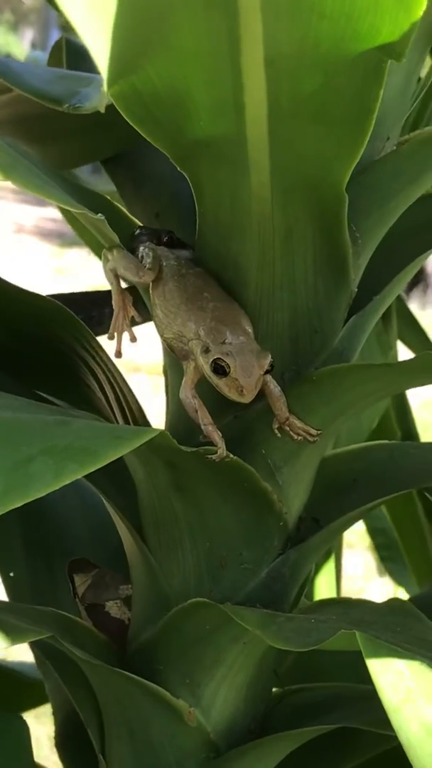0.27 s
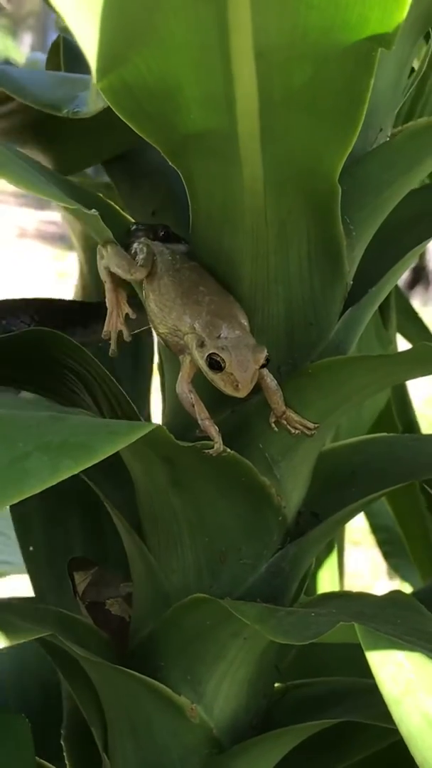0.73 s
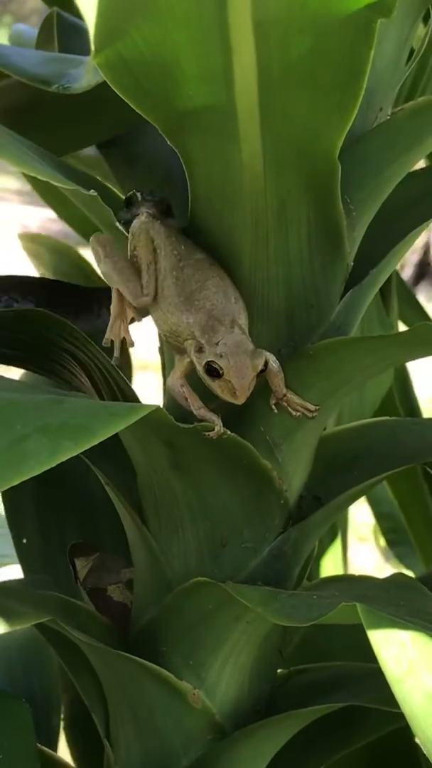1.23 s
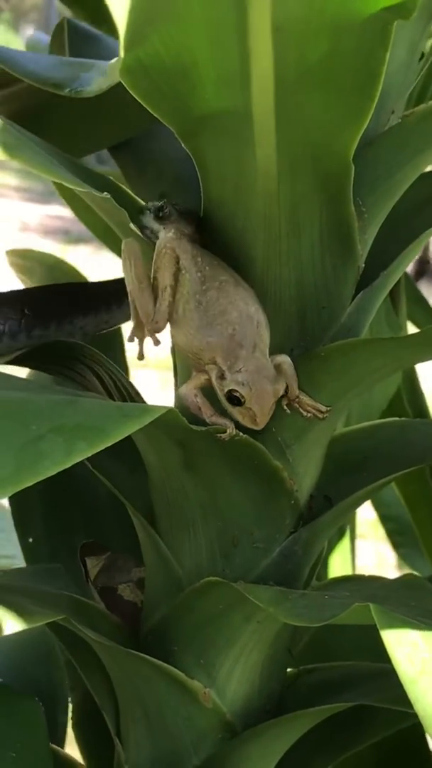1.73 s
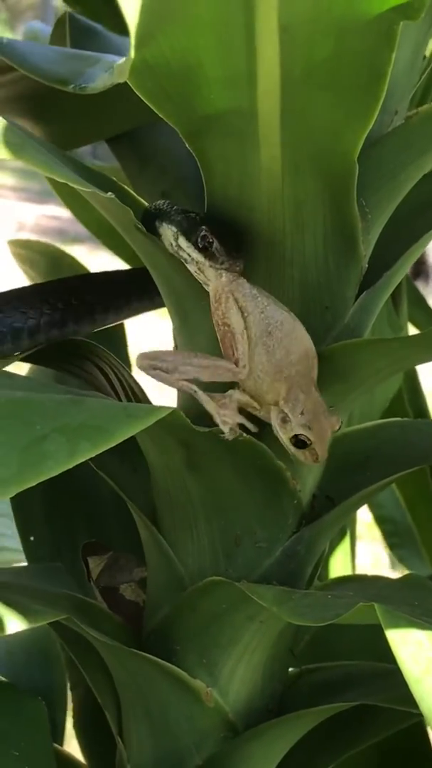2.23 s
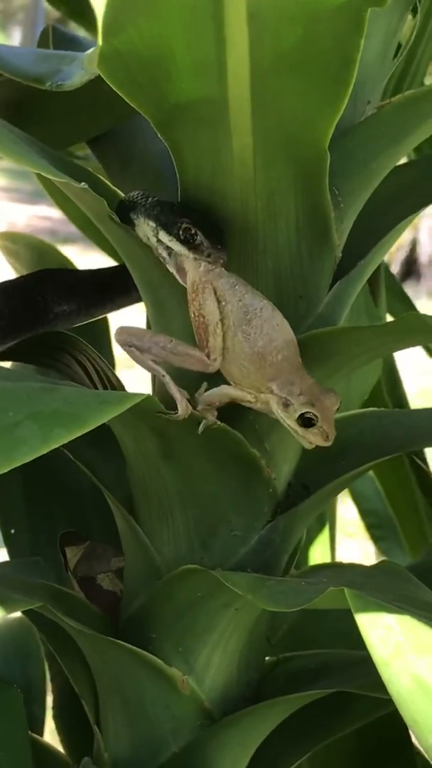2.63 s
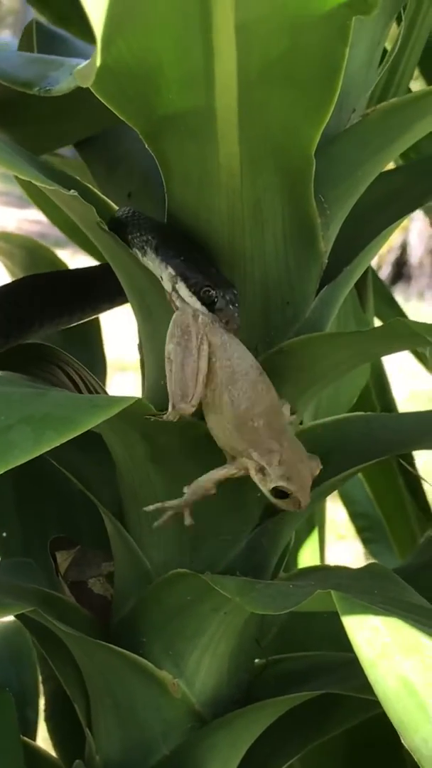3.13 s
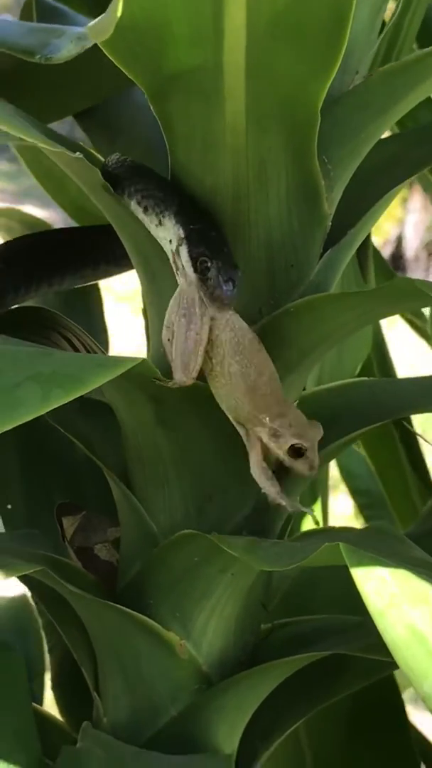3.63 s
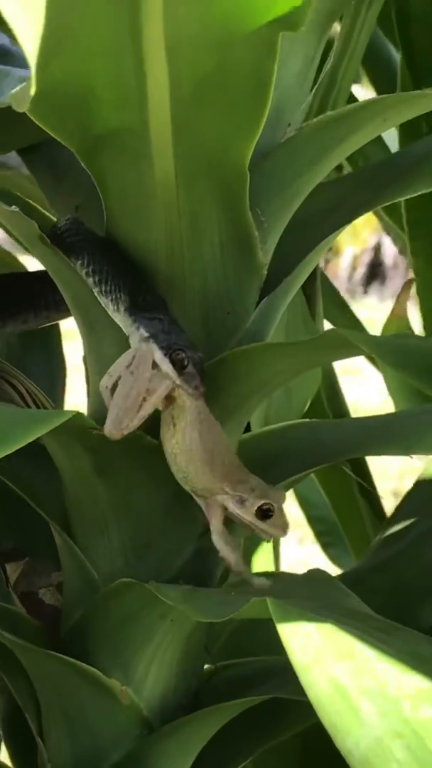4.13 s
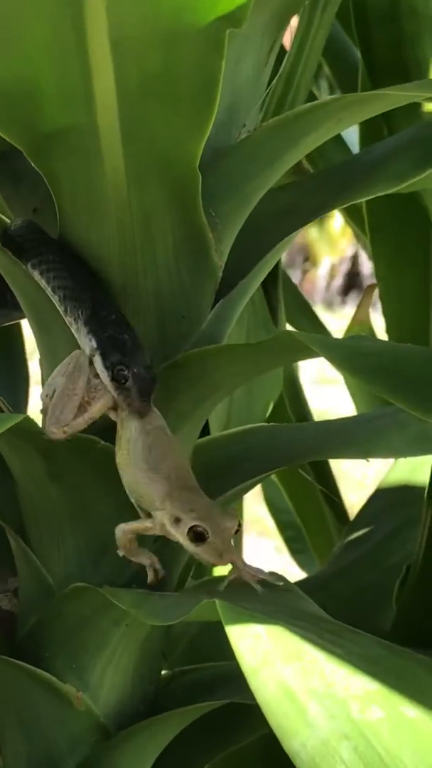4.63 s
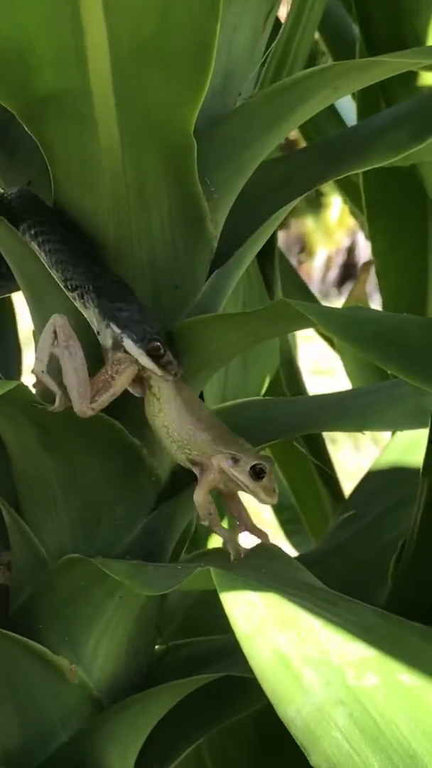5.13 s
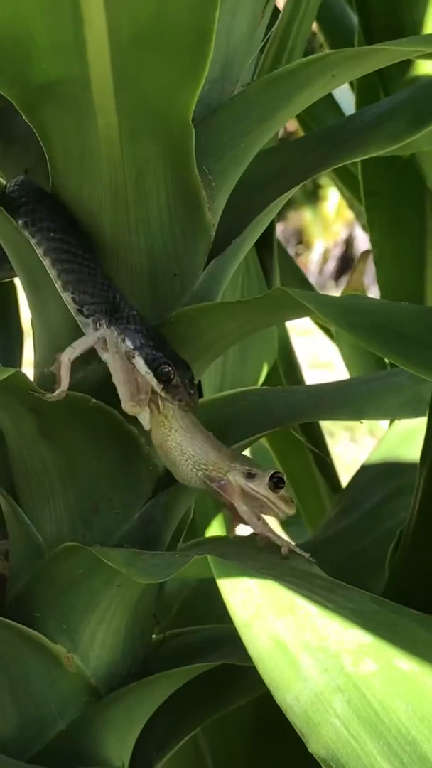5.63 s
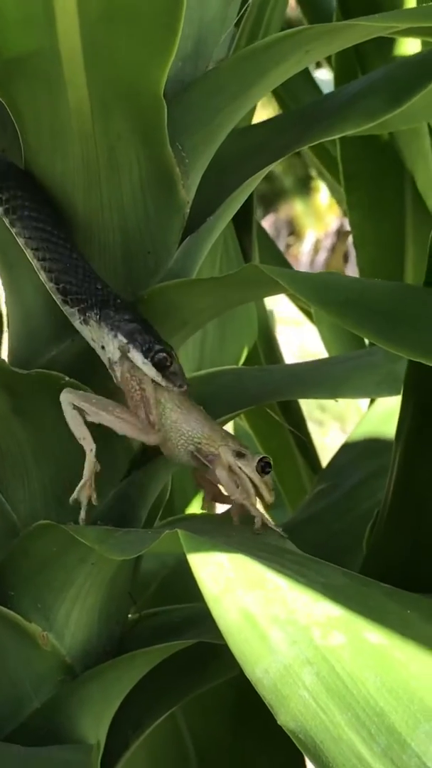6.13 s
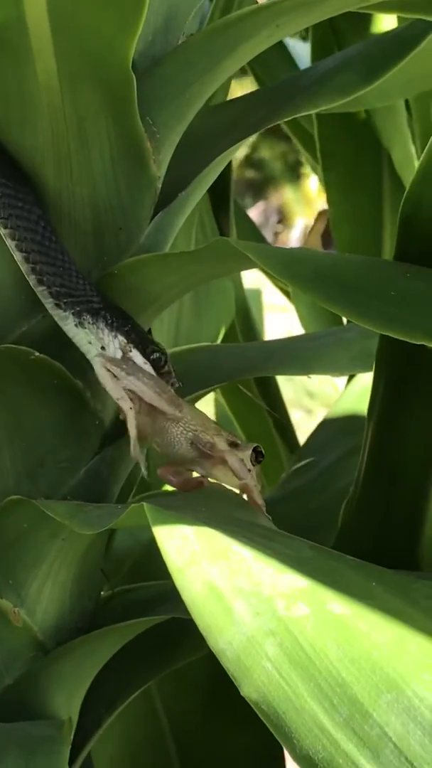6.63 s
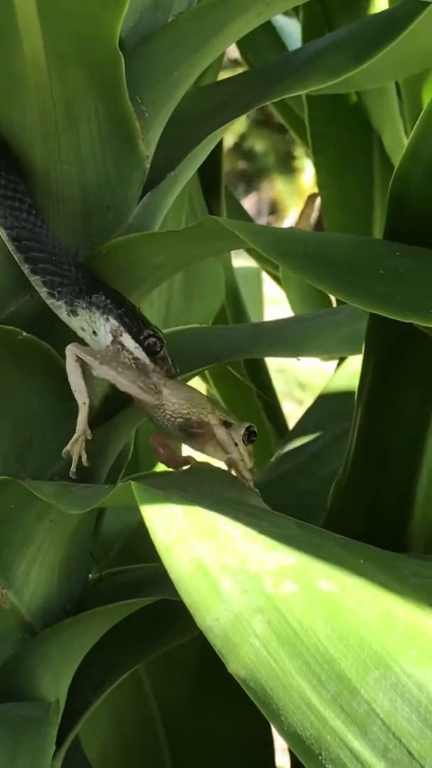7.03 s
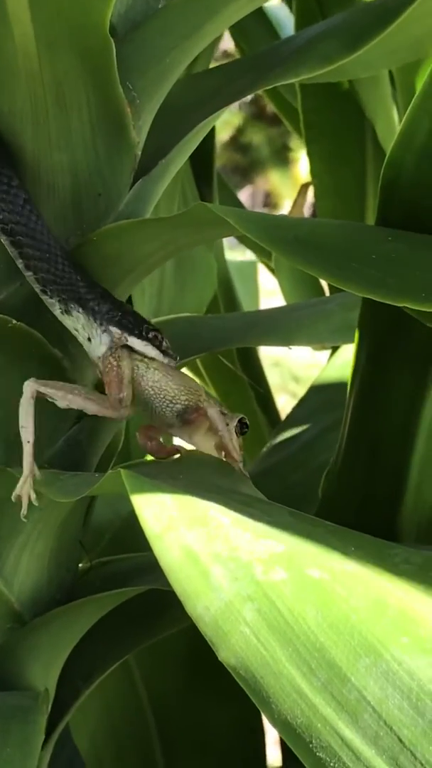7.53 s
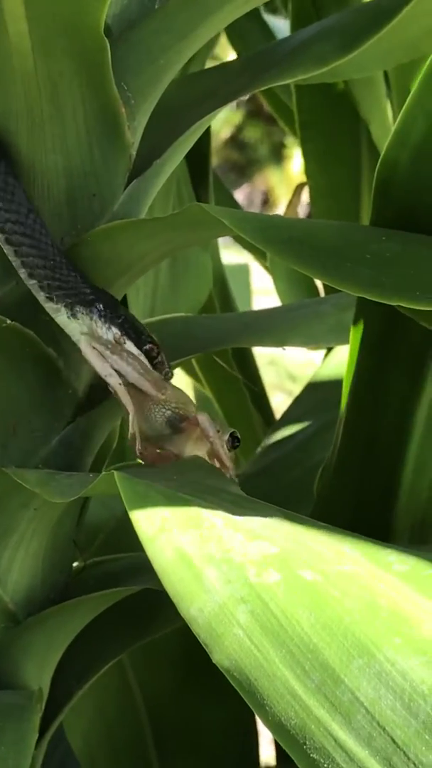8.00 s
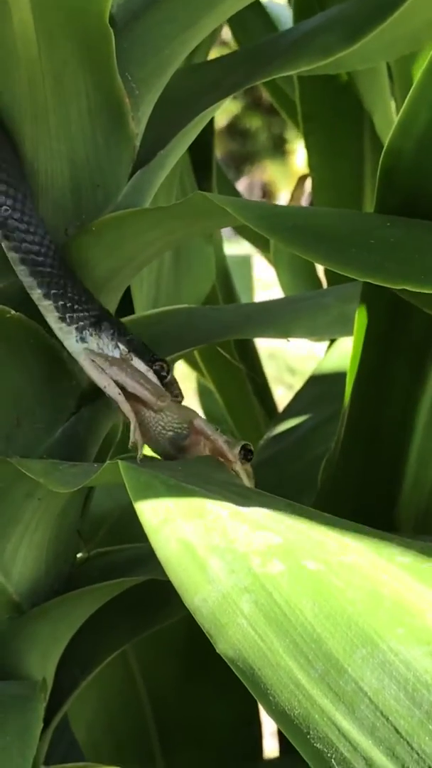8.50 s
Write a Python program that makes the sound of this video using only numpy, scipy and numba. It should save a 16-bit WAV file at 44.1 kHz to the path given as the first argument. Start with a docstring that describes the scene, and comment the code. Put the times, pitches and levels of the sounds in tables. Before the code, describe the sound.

In a quiet garden, a small bird chirps faintly far off and a leaf ticks. Then a frog held by a snake screams seven times close to the microphone, each cry short, shrill and wavering, dropping to a dull, creaking groan. Faint gasps fall between some cries. Soft gusts rumble on the microphone through the later screams, and a distant dove coos faintly twice.

```python
"""A small bird chirps far off and leaves tick in a breezy garden. From 2.4 s a tree frog, gripped by a
snake among broad leaves, screams seven times close by. Each cry follows the source-filter principle:
vocal-fold pulses ring in the open mouth, then sink to a dull, creaking groan as it shuts. Faint gasps
follow four of the cries. A distant dove coos after the second, gusts nudge the microphone from the
end of the third, and the dove coos again as the last one dies."""
import sys
import numpy as np
from scipy import signal
from scipy.fft import rfft, irfft
from scipy.io import wavfile
from scipy.ndimage import uniform_filter1d
from numba import njit

SR = 44100
rng = np.random.default_rng(int(sys.argv[2]) if len(sys.argv) > 2 else 0)


def wav_out(sig):
    """Save sig, one row per channel (or a flat mono array), as 16-bit PCM at SR to the path in sys.argv[1]."""
    wavfile.write(sys.argv[1], SR, np.round(np.clip(np.atleast_2d(sig).T, -1, 1) * 32767).astype(np.int16))


N = 386316

# Timing of each scream: start_s, jaws_open_s, voice_clears_s, jaws_shut_s, end_s
SCREAM_TIMES = [(2.405, 2.431, 2.445, 2.9, 3.0), (3.0, 3.038, 3.082, 3.34, 3.445),
                (3.74, 3.748, 3.778, 4.31, 4.382), (4.63, 4.634, 4.69, 4.955, 5.02),
                (5.342, 5.348, 5.4, 5.644, 5.732), (5.93, 5.93, 5.995, 6.243, 6.312),
                (7.508, 7.511, 7.546, 7.922, 8.008)]
# Voice of each scream: first_pitch_hz, last_pitch_hz, first_mouth_hz, mouth_width_hz, roughness,
# edge_db, top_hz, top_db, top_swell_db, throat_db, groan_db, lip_seal_db_per_s
SCREAM_VOICES = [(476, 420, 2000, 360, 0.09, -39.5, 15600, -37, 6, -42, -4.5, 49),
                 (464, 197, 2000, 530, 0.18, -32.5, 14650, -34, 1, -41.5, -2, 130),
                 (472.6, 148, 3550, 960, 0.07, -38.5, 14150, -35.5, 0, -41, 0.5, 241),
                 (524, 150, 3500, 580, 0.13, -38.5, 15400, -42, -3, -42, 0.5, 242.5),
                 (230.7, 162, 5100, 390, .08, -39, 12870, -44.5, -1, -41.5, 0, 264),
                 (355.5, 176, 5000, 620, 0.22, -39, 13320, -43.5, -6.5, -44, 4, 263),
                 (420, 210, 4200, 750, 0.05, -38, 13400, -45.5, 2, -42, 3, 283)]
# Pulse rate while the cry is held, one curve a scream: time_s, pitch_hz
HELD_PITCH = [
    [(2.435, 642), (2.477, 680), (2.587, 616), (2.619, 626), (2.647, 661), (2.753, 688), (2.835, 617.4),
     (2.877, 607), (2.89, 591)],
    [(3.045, 586), (3.055, 613), (3.089, 756), (3.123, 780), (3.163, 768), (3.203, 707.5), (3.295, 667.8),
     (3.325, 620)],
    [(3.76, 612), (3.786, 742), (3.808, 764), (3.85, 769), (3.972, 703), (4.004, 674.5), (4.164, 616.5),
     (4.268, 616.6), (4.295, 598)],
    [(4.645, 589), (4.661, 600), (4.685, 715), (4.723, 737), (4.749, 704), (4.791, 646), (4.807, 626),
     (4.847, 616.7), (4.93, 541)],
    [(5.39, 420.5), (5.402, 482), (5.418, 509), (5.434, 514), (5.478, 472.5), (5.522, 479.5),
     (5.542, 467.3), (5.62, 471)],
    [(5.96, 477), (5.996, 637), (6.01, 683), (6.026, 683), (6.058, 586), (6.11, 518), (6.2, 471.6),
     (6.22, 469)],
    [(7.525, 533), (7.543, 710), (7.569, 772), (7.603, 784), (7.651, 716), (7.675, 715.3), (7.793, 620),
     (7.869, 588.6), (7.895, 567)],
]
# Resonance of the open mouth, one curve a scream: time_s, resonance_hz, level_db
OPEN_MOUTH = [
    [(2.445, 4650, -23.5), (2.469, 6160, -29.5), (2.491, 6340, -22.5), (2.603, 5740, -21.5),
     (2.657, 4950, -26), (2.733, 5220, -20.5), (2.803, 5070, -21), (2.861, 4320, -21.5), (2.88, 4220, -26)],
    [(3.055, 4000, -29.5), (3.081, 4320, -20.5), (3.133, 4280, -24), (3.159, 4210, -20.5),
     (3.213, 4150, -21.5), (3.32, 3770, -27.5)],
    [(3.765, 6350, -19), (3.831, 6080, -17.5), (4.045, 5100, -21), (4.115, 4420, -20), (4.285, 4334, -20)],
    [(4.65, 5850, -22.5), (4.692, 6440, -22.5), (4.728, 6430, -16.5), (4.786, 5930, -17.5),
     (4.884, 5490, -24.5), (4.935, 4390, -25)],
    [(5.365, 5950, -27.5), (5.389, 6040, -22), (5.435, 6100, -18.5), (5.531, 5530, -24), (5.593, 5200, -24),
     (5.615, 5120, -25.5)],
    [(5.945, 6510, -22.5), (6.009, 6650, -20.5), (6.153, 6000, -19.5), (6.215, 5480, -27.5)],
    [(7.525, 6920, -22), (7.585, 6990, -15.5), (7.667, 6590, -15), (7.715, 5740, -23), (7.885, 5200, -24),
     (7.895, 5220, -21)],
]
# Stretches where the folds beat unevenly: start_s, end_s, roughness
RASPS = [(2.486, 2.56, .45), (2.791, 2.82, 0), (3.251, 3.31, 0.33), (3.859, 3.901, 0.37),
         (4.72, 4.774, 0.5), (6.09, 6.153, 0.42)]
# Cracks in the voice: centre_s, half_width_s, jump_db
CRACKS = [(2.52, 0.016, -3.5), (3.061, .004, 4), (3.069, 0.0041, -0.5), (3.128, 0.011, -3.5),
          (3.778, 0.00491, -6), (4.011, 0.0067, -5.5), (4.025, 0.01806, -2.5), (4.873, 0.0057, 3),
          (4.892, 0.0091, -2.5), (5.506, 0.0071, -1.5), (5.632, 0.0059, 3), (6.242, 0.005, 3),
          (7.639, 0.0078, -2.5), (7.88, 0.0078, 2), (7.896, 0.0058, -9)]
def frog(mouth_db, top_db, throat_db, flutter_db):
    """Source-filter model: fold pulses excite the mouth, the shrill modes above it and the throat."""
    t = clock()
    screams = [scream(*cry) for cry in zip(SCREAM_TIMES, SCREAM_VOICES, HELD_PITCH, OPEN_MOUTH)]
    pitch, rough, mouth_hz, width_hz, top_hz, loud, edge, top, wall = in_time(np.vstack(screams))
    gape = np.clip((loud + 50) / 26, 0, 1)   # the louder the cry, the wider the jaws
    rasps = sum(amount * ((t > start) & (t < end)) for start, end, amount in RASPS)
    rough = rough + uniform_filter1d(rasps, size=500)
    cracks_db = sum(db * np.exp(-((t - s) / half_width) ** 2) for s, half_width, db in CRACKS)
    pulses, puffs = vocal_folds(pitch * (1 + .0017 * cracks_db), rough)   # cracks also jog the pitch
    source = pulses + (.0015 + .021 * rough) * puffs
    breathy = pulses + (.045 + .19 * rough) * puffs   # turbulence weighs more in the treble
    mouth_gain = from_db(loud + mouth_db + cracks_db + flutter_db * drift(62))
    cry = mouth_gain * mouth(source, mouth_hz, width_hz)
    cry += from_db(edge) * bright_edge(breathy)
    cry += from_db(top + top_db) * top_mode(breathy, top_hz)
    cry += from_db(wall + throat_db) * throat(source, gape)
    return sounding(screams, fade_s=.00622) * cry


def scream(timing, voice, held_pitch, held_mouth):
    """Articulation: in one breath the jaws open, hold and shut, moving the resonances and levels."""
    start, opens, clears, shuts, end = timing
    first_hz, last_hz, first_mouth_hz, width_hz, hoarse = voice[:5]
    edge_db, top_hz, top_db, top_swell_db, throat_db, groan_db, seal_db_per_s = voice[5:]
    t = np.linspace(start, end, 600)
    since, left = np.maximum(t - opens, 0), np.maximum(shuts - t, 0)
    along = since / (since + left) - .5   # -0.5 as the jaws open, +0.5 as they shut
    unopened, closing = np.exp(-since / .006), np.exp(-left / .0076)
    shut = np.maximum(unopened, closing)
    closed_s = np.maximum(np.maximum(opens - t, t - shuts), 0)
    sealed_db = seal_db_per_s * closed_s

    # The pitch scoops up, holds, then sinks to a groan as the air runs out.
    release_s, release_hz = held_pitch[-1]
    spent = np.clip((t - release_s) / (end - release_s), 0, 1)
    droop = spent ** 4
    pitch = np.interp(t, *np.transpose([(start, first_hz), *held_pitch]))
    pitch += (last_hz - pitch) * (.64 * spent + .36 * droop)
    sunk_octaves = np.clip(np.log2(release_hz / pitch), 0, 1) * (t > shuts)
    attack = np.exp(-(since / (clears - opens)) ** 6)
    rough = hoarse + .7 * attack + .25 * sunk_octaves   # hoarse at both ends

    times, resonances, levels = np.transpose(held_mouth)
    mouth_hz, held_db = np.interp(t, times, resonances), np.interp(t, times, levels)
    mouth_hz += (first_mouth_hz - mouth_hz) * np.exp(-since / .0093)   # climbs as the jaws open
    mouth_hz += (3107 - mouth_hz) * np.exp(-left / .017)   # sinks as they shut
    width = width_hz * 2 ** (.4 * (levels.mean() - held_db))   # louder is narrower
    width += (1100 - width) * shut
    leak = 1 - np.exp(-closed_s / .008)   # shut lips leave only a broad, thin leak
    mouth_hz += (5500 - mouth_hz) * leak
    width += (2200 - width) * leak
    sagging_top_hz = top_hz - 1500 * along

    # Levels in dB: shut jaws muffle the mouth, the edge and the top.
    effort = np.log2(pitch / 620)   # a higher scream is a brighter one
    edge_hz, edge_width_hz, _ = EDGE_MODES[0]
    nearness = np.log2(2090 / np.maximum(edge_hz - mouth_hz, edge_width_hz))   # close modes reinforce
    loud = held_db - 25.5 * shut - sealed_db - 13 * sunk_octaves
    edge = edge_db + 9 * effort + 10.5 * nearness - 10.5 * shut - sealed_db - 13 * sunk_octaves
    top = top_db + 10.5 * effort + top_swell_db * along - 11.5 * shut - sealed_db

    # The throat wall swells through the scream and carries on as the groan.
    strain = np.maximum(np.log2(pitch / 715), 0)   # the voice thins at its highest
    catch = np.exp(-((t - shuts) / .0089) ** 2)   # and catches as the jaws shut
    wall = throat_db + 4.5 * along - 6.5 * unopened + groan_db * closing
    wall -= 40 * strain + 8 * catch + 7 * droop
    return np.transpose([t, pitch, rough, mouth_hz, width, sagging_top_hz, loud, edge, top, wall])


def vocal_folds(pitch_hz, rough, waver=.0024, shimmer_db=.15):
    """Glottal excitation: a sharp pulse each cycle, with a puff of breath noise centred on it."""
    jitter = .0005 + .009 * rough
    hz = pitch_hz * (1 + waver * drift(61.33) + jitter * drift(440))
    phase = np.cumsum(hz) / SR
    offset = (phase - np.round(phase)) * SR / hz   # samples from the nearest pulse
    pulses = np.sinc(.85 * offset) * np.exp(-(offset / 9) ** 2)
    puffs = rng.standard_normal(N) * np.cos(np.pi * phase) ** 4
    return pulses * from_db(shimmer_db * (1 + 6 * rough) * drift(200)), puffs


# Steady resonances of the head: centre_hz, width_hz, level_db
PALATE_MODES = [(3076, 100, -22.5), (3884, 504, -21.5), (5560, 320, -15), (6960, 110, -33)]
def mouth(source, centre_hz, width_hz, palate_db_per_octave=-15.5):
    """Cavity resonance: a narrow moving peak on a broad one; the palate's modes fade as it climbs."""
    palate = from_db(palate_db_per_octave * np.log2(centre_hz / 5200)) * resonate(source, PALATE_MODES)
    peak = formant(source, centre_hz, width_hz)
    ring = formant(peak, centre_hz, width_hz=2370) + palate
    return even(cut(cut(ring, 1600, "high", order=3), 8310, "low", order=5))


# Shrill resonances above that of the mouth: centre_hz, width_hz, level_db
EDGE_MODES = [(7830, 590, 10), (9630, 990, -1), (11870, 210, 1), (12800, 470, -13), (15370, 550, -5)]
def bright_edge(source):
    """Higher modes: steady treble resonances give the cry its edge."""
    return even(cut(resonate(source, EDGE_MODES), 6980, "high", order=6))


def top_mode(source, centre_hz):
    """Formant glide: one moving resonance colours the highest treble."""
    return even(cut(formant(source, centre_hz, width_hz=750), 11000, "high", order=4))


def throat(source, gape, shut_hz=1572, open_hz=2000, leak_db=-23):
    """Wall resonance: the throat rings low and dull, and lower still once the mouth has shut."""
    ring = formant(source, shut_hz + (open_hz - shut_hz) * gape, width_hz=376)
    dull = cut(cut(ring, 860, "high", order=3), 3800, "low", order=5)
    leak = from_db(leak_db) * gape * cut(source, (2600, 3400), "band")
    return even(dull + leak)


# Breaths drawn between screams: centre_s, length_s, level_db
GASPS = [(3.52, 0.068, -53), (4.5, 0.05, -51), (5.81, 0.075, -49.5), (6.39, 0.08, -51.5)]
def gasps(squeak_hz, width_hz):
    """Noise-driven resonance: air drawn back through the narrow glottis squeaks faintly."""
    squeak = formant(rng.standard_normal(N), squeak_hz * (1 + .07 * drift(20)), width_hz)
    return swells(GASPS) * rms_one(cut(squeak, (1200, 2800), "band"))


# Snaps of a leaf: start_s, relative_level_db
TICKS = [(0.3654, -37), (0.39, -25.5), (0.4044, -38), (5.1721, -46.5)]
# Spectrum of a snap: frequency_hz, level_db
TICK_SPECTRUM = [(1500, -20), (2500, -6), (4000, -13), (7000, -9.5), (14000, 2), (16000, -21)]
def leaf_ticks(t60_s, gain_db):
    """Damped transients: a stiff leaf slips and snaps under the animals."""
    t = clock()
    bursts = sum((t >= s) * from_db(db - 60 * np.clip((t - s) / t60_s, 0, 2)) for s, db in TICKS)
    return from_db(gain_db) * bursts * noise(TICK_SPECTRUM)


# Strength of the breeze: time_s, level_db
BREEZE = [(0, -47), (.5, -45), (.7, -49), (1.9, -50.5), (2.2, -47), (3.4, -52.5), (4.4, -43), (5.1, -45.5),
          (5.7, -39.5), (6.9, -40.5), (7.7, -48.5), (8.76, -49)]
# Gusts on the microphone: centre_s, length_s, level_db
GUSTS = [(4.44, 0.047, -35.5), (5.17, 0.049, -35.5), (5.3, 0.053, -35), (5.61, 0.056, -33),
         (5.73, 0.053, -32.5), (5.86, .06, -32), (5.99, 0.075, -28.5), (6.1, .06, -35.5),
         (6.22, 0.043, -38), (6.44, 0.11, -27), (6.78, 0.08, -34), (7.08, 0.086, -36.5), (7.46, .05, -34)]
# Spectrum of the rumble: frequency_hz, density_db
WIND_SPECTRUM = [(25, -15), (40, 2.5), (62, 6.5), (80, -1), (120, -5), (160, -13), (250, -28.5),
                 (400, -38.5)]
def wind(gain_db, lump_db):
    """Turbulent pressure on the microphone: breeze and gusts add in power."""
    breeze = from_db(in_time(BREEZE)[0] + gain_db + lump_db * drift(7.1))
    return np.hypot(breeze, swells(GUSTS)) * noise(WIND_SPECTRUM)


# The small bird's rising chirps: start_s, length_s, start_pitch_hz, level_db
CHIRPS = [(.35, .13, 2150, -65), (.42, 0.083, 2900, -70), (.845, 0.091, 2080, -63), (.93, .1, 2850, -71),
          (.985, .1, 2220, -66), (1.377, 0.13, 2200, -64), (1.5, .1, 2250, -66)]
# The dove's level coos: start_s, length_s, pitch_hz, level_db
COOS = [(3.431, 0.18, 658, -59), (3.55, .23, 498, -69), (7.95, 0.48, 521.5, -59)]
def bird(calls, rise_hz_per_s):
    """Pure-tone song: each far call is one sinusoid, level or in a linear sweep."""
    out = np.zeros(N)
    for start, length, hz, db in calls:
        age, at = np.arange(int(length * SR)) / SR, int(start * SR)
        envelope = from_db(db) * np.sqrt(2 * np.sin(np.pi * age / length))
        phase = np.cumsum(hz + rise_hz_per_s * age) / SR
        out[at:at + len(age)] += envelope * np.sin(2 * np.pi * phase)
    return out


# Strength of the background hiss: time_s, relative_level_db
HISS_LEVEL = [(0, -60), (.5, -58.5), (.9, -65), (1.3, -62), (2.2, -64.5), (3.6, -66.5), (5.15, -70),
              (6.6, -69), (7.4, -70), (8.1, -61.5), (8.76, -61)]
# Spectrum of the hiss: frequency_hz, density_db
HISS_SPECTRUM = [(2200, -5), (3300, 1.5), (4900, -6.5), (6000, -5), (9700, -8), (10500, -9), (12500, -8.5),
                 (15000, -9), (16000, -16)]
def hiss(gain_db, flicker_db):
    """Amplitude-modulated noise: a faint treble hiss sinks during the screams and returns afterwards."""
    level_db = in_time(HISS_LEVEL)[0] + gain_db + flicker_db * drift(25)
    return from_db(level_db) * noise(HISS_SPECTRUM)


# Spectrum of the far outdoors: frequency_hz, density_db
WASH_SPECTRUM = [(90, 4), (150, 3), (200, -0.5), (280, -5.5), (430, -8), (560, -4.5), (980, -5),
                 (1550, -10), (2040, -15.5), (3000, -20.5)]
def far_wash(level_db):
    """Ambient noise floor: a low, nearly steady wash from far away."""
    return from_db(level_db + .5 * drift(8.8)) * noise(WASH_SPECTRUM)


# Reflections off near leaves: delay_s, gain_db
LEAF_ECHOES = [(.0009, -22), (.0027, -24.5), (.0062, -20)]
def garden(x, tail_db, t60_s):
    """Reflection and scattering: near leaves return short echoes, farther plants a diffuse tail."""
    t = clock()
    echoes = sum(from_db(db) * np.interp(t - delay, t, x) for delay, db in LEAF_ECHOES)
    age = t[:SR // 2]
    scatter = rng.standard_normal(len(age)) * from_db(-60 * age / t60_s) * (1 - np.exp(-age / .014))
    tail = signal.fftconvolve(x, scatter / np.linalg.norm(scatter))[:N]
    return x + echoes + from_db(tail_db) * tail


def resonate(x, modes):
    """Modal superposition: parallel resonances with alternating signs."""
    out = 0
    for k, (hz, width_hz, db) in enumerate(modes):
        r = np.exp(-np.pi * width_hz / SR)
        zeros = np.array([1, 0, -1]) * (1 - r * r) / 2
        poles = [1, -2 * r * np.cos(2 * np.pi * hz / SR), r * r]
        out = out + (-1) ** k * from_db(db) * signal.lfilter(zeros, poles, x)
    return out


def formant(x, hz, width_hz):
    """A moving resonance; its bandwidth may be a number or a curve."""
    return glide(x, hz, np.maximum(width_hz, 50) * np.ones(N))


@njit
def glide(x, hz, width_hz):
    """A two-pole resonator, retuned at every sample."""
    y, r = np.zeros(len(x)), np.exp(-np.pi * width_hz / SR)
    for i in range(2, len(x)):
        drive = (1 - r[i] ** 2) / 2 * (x[i] - x[i - 2])
        y[i] = drive + 2 * r[i] * np.cos(2 * np.pi * hz[i] / SR) * y[i - 1] - r[i] ** 2 * y[i - 2]
    return y


def cut(x, hz, kind, order=2):
    """Butterworth filter."""
    return signal.sosfilt(signal.butter(order, hz, kind, fs=SR, output="sos"), x + 1e-18)


def noise(spectrum):
    """Spectral shaping: unit-rms noise that falls 10 dB an octave beyond the given spectrum."""
    hz, db = np.transpose(spectrum)
    octave, known = np.log2(np.maximum(np.arange(N // 2 + 1) * SR / N, 1)), np.log2(hz)
    beyond = np.abs(octave - np.clip(octave, known[0], known[-1]))
    gain = from_db(np.interp(octave, known, db) - 10 * beyond)
    return rms_one(irfft(rfft(rng.standard_normal(N)) * gain, N))


def drift(rate_hz):
    """Random modulation: low-passed noise of unit rms, drawn every 20 samples."""
    r = np.exp(-40 * np.pi * rate_hz / SR)
    slow = signal.lfilter([1], [1, -2 * r, r * r], rng.standard_normal(N // 20 + 4002))[4000:]
    return np.interp(np.arange(N) / 20, np.arange(len(slow)), rms_one(slow))


def swells(rows):
    """Gaussian envelopes: a rise and fall of gain for each row."""
    return sum(from_db(db) * np.exp(-(2 * (clock() - s) / length) ** 2) for s, length, db in rows)


def sounding(curves, fade_s):
    """Gating: 1 within each curve's span, with short ramps."""
    t = clock()
    return sum(np.clip(np.minimum(t - c[0][0], c[-1][0] - t) / fade_s + .5, 0, 1) for c in curves)


def in_time(rows):
    """Linear interpolation of each column of a curve, sample by sample."""
    times, *columns = np.transpose(rows)
    return [np.interp(clock(), times, column) for column in columns]


def even(x):
    """Hold the short-term rms at 1."""
    power = uniform_filter1d(uniform_filter1d(x * x, size=400), size=400)
    return x / np.sqrt(np.abs(power) + 1e-12)


def rms_one(x):
    """Scale to unit rms."""
    return x / np.sqrt(np.mean(x ** 2) + 1e-20)


def from_db(db):
    """Decibels to gain."""
    return 10 ** (np.asarray(db) / 20)


def clock():
    """The time of every sample, in seconds."""
    return np.arange(N) / SR


def scene():
    """Superposition: all sources add at one microphone, alike in both channels."""
    voice = frog(mouth_db=.22, top_db=.5, throat_db=1, flutter_db=1.07)
    voice += gasps(squeak_hz=1850, width_hz=220)
    birds = bird(CHIRPS, rise_hz_per_s=7800) + bird(COOS, rise_hz_per_s=0)
    mono = garden(voice, tail_db=-41, t60_s=.25) + garden(birds, tail_db=-6, t60_s=.34)
    mono += leaf_ticks(t60_s=.028, gain_db=-10)
    mono += wind(gain_db=.16, lump_db=1.94)
    mono += hiss(gain_db=3, flicker_db=1.67) + far_wash(level_db=-51)
    return np.array([mono, mono])


def record(dry):
    """Band limiting: an elliptic low-pass cuts the top steeply."""
    cutoff_hz = 15850
    return signal.sosfilt(signal.ellip(12, .1, 80, cutoff_hz, fs=SR, output="sos"), dry)


dry = scene()
out = record(dry)
wav_out(out)
```